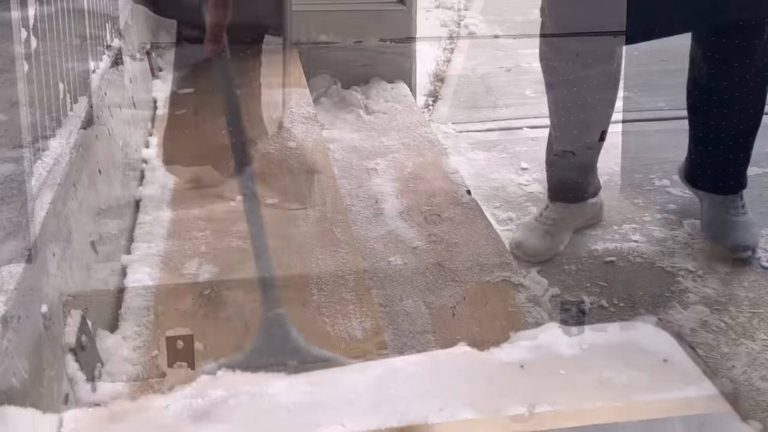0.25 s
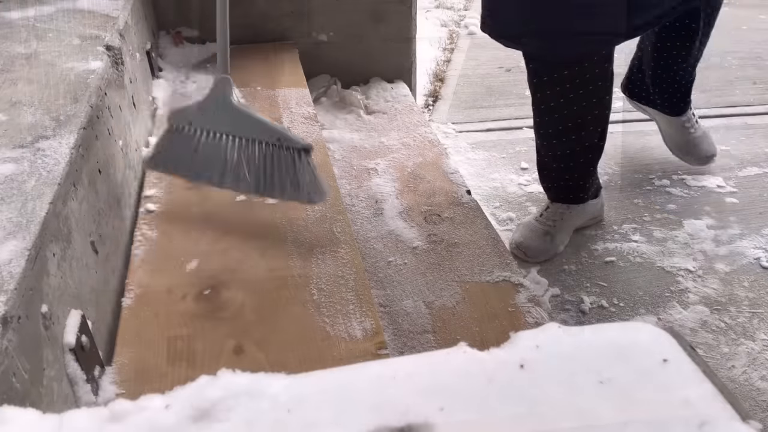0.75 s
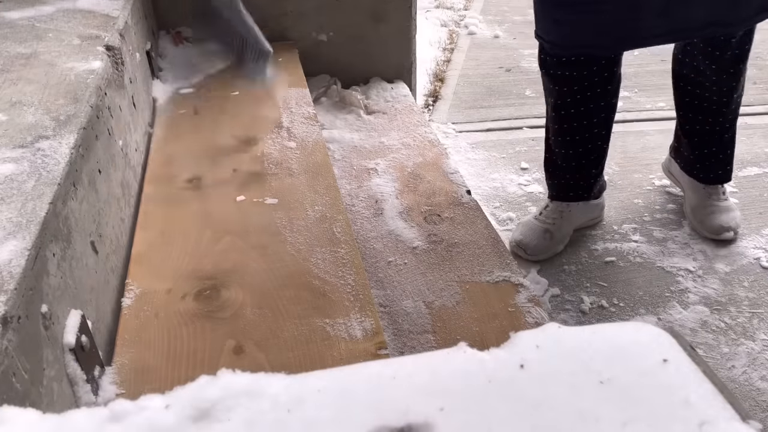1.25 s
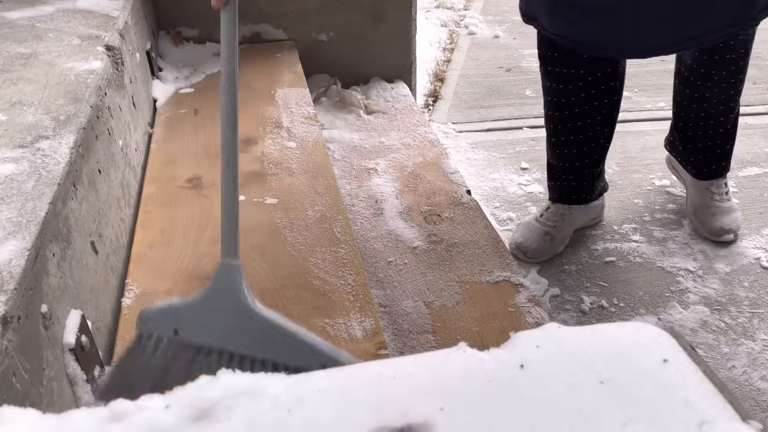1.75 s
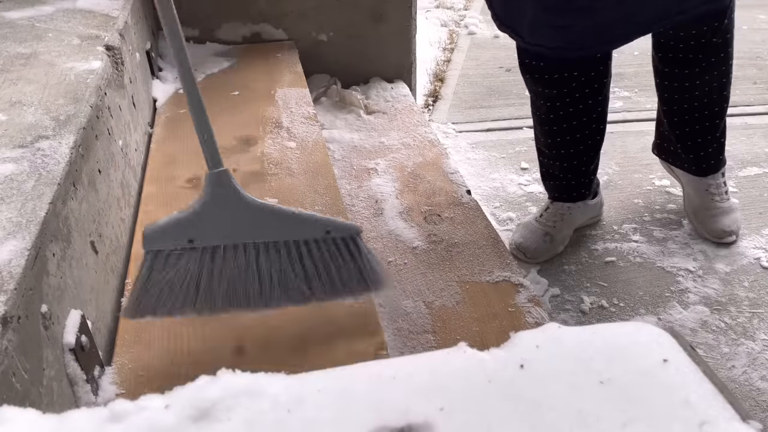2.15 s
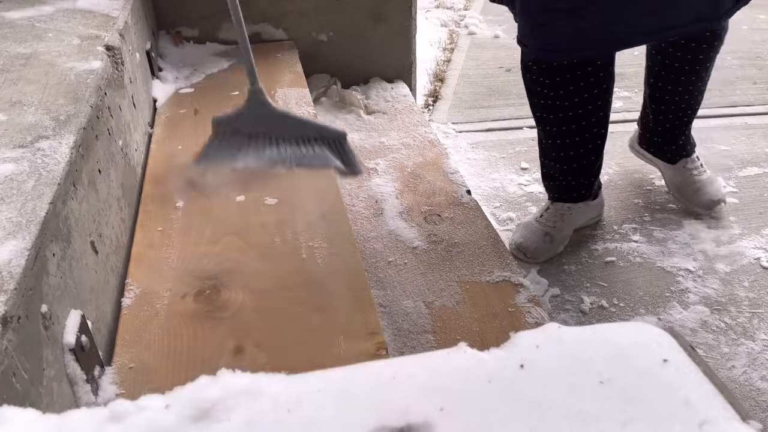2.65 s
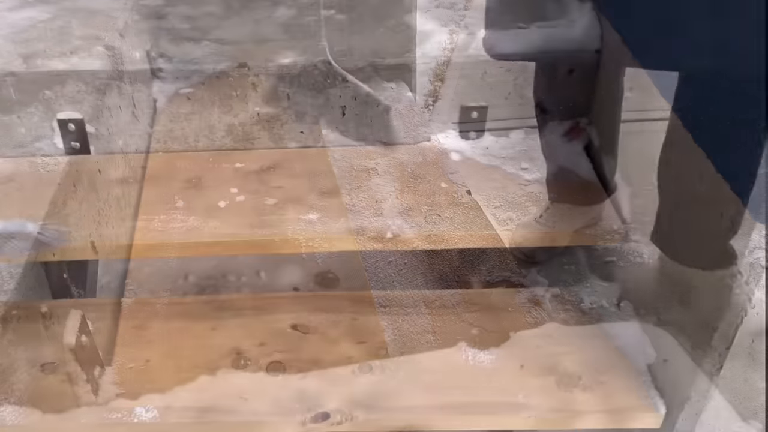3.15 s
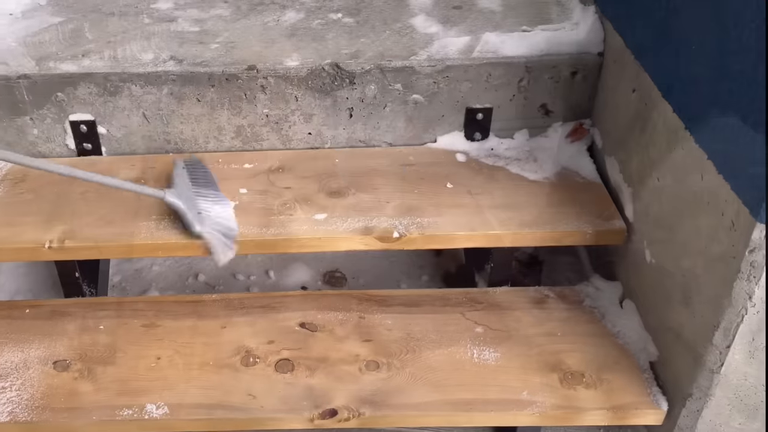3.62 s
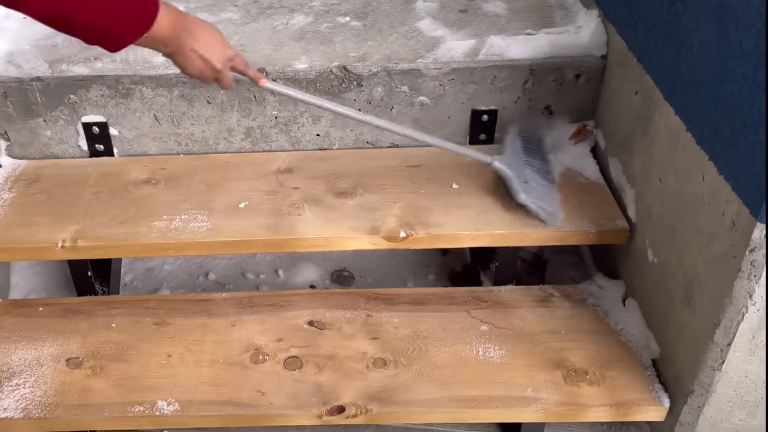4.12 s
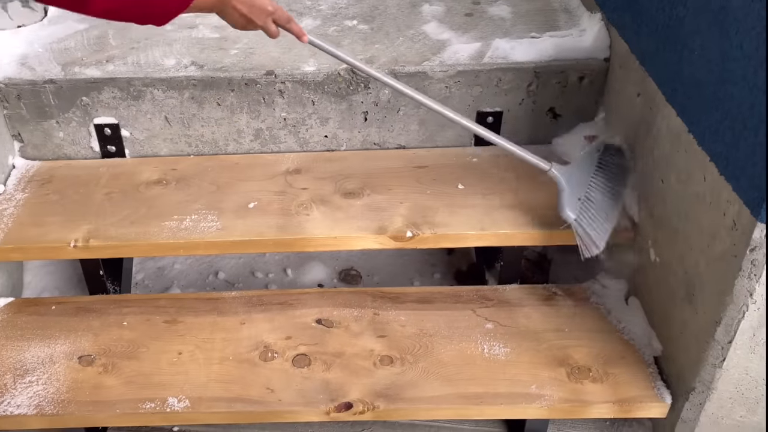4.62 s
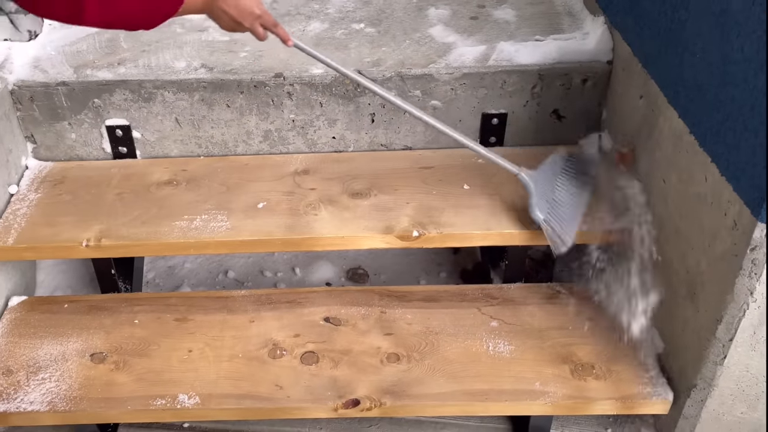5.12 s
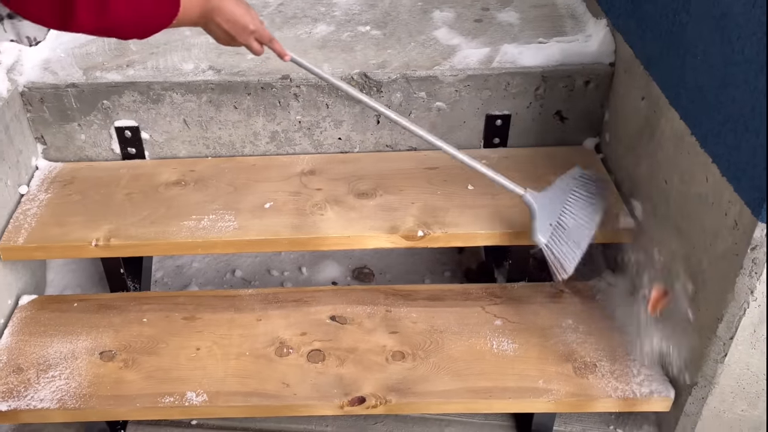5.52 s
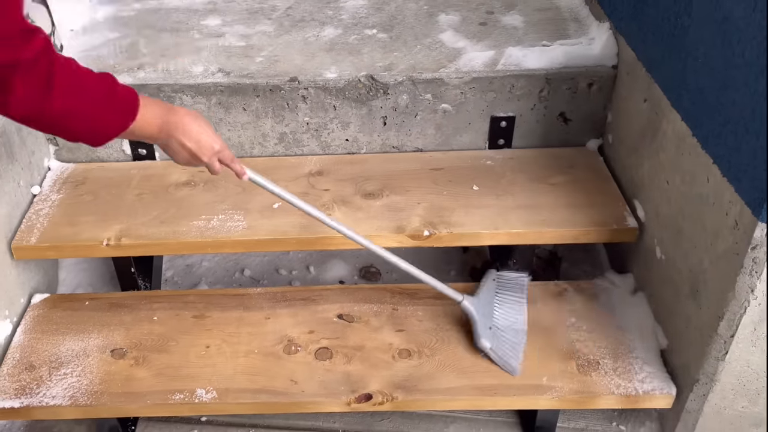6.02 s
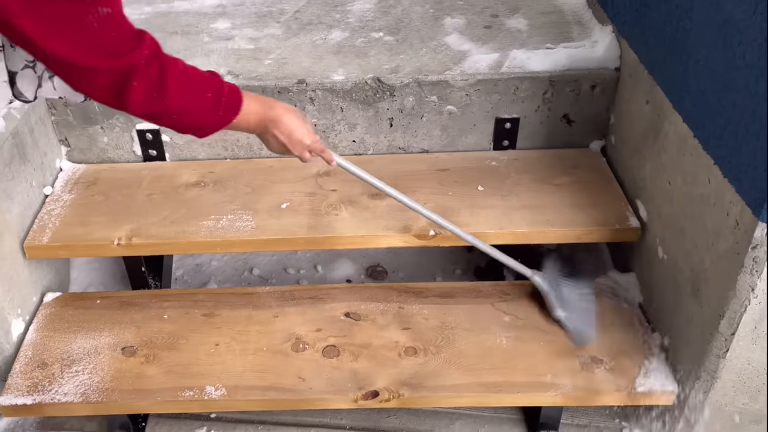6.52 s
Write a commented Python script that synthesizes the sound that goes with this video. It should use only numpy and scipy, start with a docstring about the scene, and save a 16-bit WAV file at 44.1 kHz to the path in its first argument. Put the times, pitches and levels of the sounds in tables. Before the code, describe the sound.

Close stereo pickup of a plastic-bristle broom on snowy wooden steps beside concrete. Slow, soft swishes and gritty scrapes come first, with low hollow plank thuds as the broom lands. After a near pause, strokes grow quicker and brighter; a very loud hard plastic knock hits near five seconds, another near six and a half. Faint traffic rumbles far behind.

```python
"""A plastic-bristle broom sweeps light snow off wooden steps beside a concrete wall, over far traffic.
Bristle tips that stick and slip are dense random clicks, filtered into hiss, scrape and drag on the planks.
Planks thud where the broom lands, as dying modes; its head knocks on edges, as a crack and a ring.
Traffic is bands of noise. Two microphone ports a short way apart pick the sound up."""
import sys
import numpy as np
from scipy import signal
from scipy.fft import rfft, irfft, next_fast_len
from scipy.io import wavfile
from scipy.ndimage import uniform_filter1d

SR = 44100
rng = np.random.default_rng(int(sys.argv[2]) if len(sys.argv) > 2 else 0)


def to_wav(s):
    """Save 16-bit WAV."""
    ch = np.atleast_2d(s).T  # columns
    pcm = np.round(np.clip(ch, -1, 1) * 32767)  # PCM
    wavfile.write(sys.argv[1], SR, pcm.astype(np.int16))


def undo_db(level):
    """Turn decibels back into plain size, where 20 dB means ten times bigger."""
    steps = np.asarray(level, float) / 20
    return 10 ** steps


N = 298448
FAST = next_fast_len(N)
NEXT_STEP_S = 3.3  # from here on the broom works on the far plank

# Modes of the broom head. Each row: frequency in Hz, level in dB, 60 dB decay time in seconds.
HEAD_MODES = [(458, -1, 0.04), (580, -6, .04), (775, -3, 0.06), (1040, -4, 0.036), (1177, 0, 0.05),
              (1340, -5, .04), (1780, -7, 0.045), (1975, -4, 0.03), (2280, -4, 0.03), (2610.9, -7, 0.022),
              (3190, 0, 0.018), (3780, -6, 0.03), (4780, -7, .014)]
# Modes of the near plank. Each row: frequency in Hz, level in dB, 60 dB decay time in seconds.
NEAR_PLANK_MODES = [(114.62, 1.5, 1), (246.71, -3.5, 0.3413), (303.5, -10.5, 0.2919)]
# Modes of the far plank. Each row: frequency in Hz, level in dB, 60 dB decay time in seconds.
FAR_PLANK_MODES = [(116.62, -4, 1), (225.16, 3.5, 0.3695), (252.77, -4, 0.2458), (442.59, -9, 0.09324)]


def evened(x):
    """Normalises mean power: scales to rms 1."""
    return x / np.sqrt(np.mean(x ** 2) + 1e-20)


def read(points, hz, column=1):
    """Pitch is logarithmic: reads a spectrum table along a log-frequency axis."""
    rows = np.transpose(points)
    return np.interp(np.log(hz + 1), np.log(rows[0] + 1), rows[column])


def curve(rows, t, column):
    """Linear interpolation in time: one column of a time table at the times t."""
    rows = np.transpose(rows)
    return np.interp(t, rows[0], rows[column])


def coloured(x, points):
    """Linear filtering multiplies spectra: applies a table of gains without phase shift."""
    gain = undo_db(read(points, np.fft.rfftfreq(FAST, 1 / SR)))
    return irfft(rfft(x, FAST) * gain, FAST)[:, :N]


def ports(pair, direct=0):
    """Partial coherence: the right port hears a phase-shifted share of the left sound and an unrelated share."""
    # Each row: frequency in Hz, likeness 0-1 for direct=0, phase by which left leads in radians,
    # left over right in dB.
    spacing = [(59.95, 0.99, 0, 1.6366), (364.82, 0.8, 0.0206, 1), (761.1, 0, 0.5678, 0),
               (1188.9, 0.16, 1.5, 3), (2100, 0.62, 0.3893, 0.5), (3778.4, 0.27, 0.7745, 5),
               (5670.7, 0.51, -2.5, 3.5), (6573.4, 0.97, 0, -1.5), (7802, 0.91, -3, 4.5),
               (9034.9, 0.99, -3, -2.5), (11491, 0.35, -6, 1.5), (12752, 1, -6, 0)]
    hz = np.fft.rfftfreq(FAST, 1 / SR)
    left, unrelated = rfft(pair, FAST)
    same = np.clip(read(spacing, hz), 0, 1) ** (1 - direct)  # more alike when direct
    shifted = left * np.exp(-1j * read(spacing, hz, column=2))
    right = same * shifted + np.sqrt(1 - same ** 2) * unrelated
    lean = undo_db(read(spacing, hz, column=3) / 2)
    return irfft(np.array([left * lean, right / lean]), FAST)[:, :N]


def in_band(x, lo_hz, hi_hz):
    """Band power sets the level: scales a stereo sound to rms 1 in one band of its middle."""
    bandpass = signal.butter(4, [lo_hz, hi_hz], "band", fs=SR, output="sos")
    band = signal.sosfilt(bandpass, x.mean(0))
    return x / np.sqrt(np.mean(band ** 2))


def ring(modes, shift_db=0, turns=0):
    """Modal superposition: one second of decaying sines, with lifts and starting phases in turns."""
    t = np.arange(SR) / SR
    hz, db, t60 = np.transpose(modes)[:, :, None]
    decay = undo_db(db + shift_db - 60 * t / t60)
    return (decay * np.sin(2 * np.pi * (hz * t + turns))).sum(0)


def slips(per_s, spread_db, clump_db, clump_s):
    """Stick-slip friction: bristle tips let go in dense random clicks of unequal size, in clumps."""
    happens = rng.exponential(1, (2, N))
    size = undo_db(spread_db * np.minimum(happens, 4)) * (rng.random(N) < per_s / SR)
    clumps = evened(uniform_filter1d(rng.standard_normal(N), max(round(clump_s * SR), 1)))
    return size * rng.standard_normal((2, N)) * undo_db(clump_db * clumps)


def motion():
    """Powers of independent sounds add: levels of hiss, scrape and drag from rustle, strokes, landings, flicks."""
    # A faint rustle throughout. Each row: time in seconds, hiss level in dB, scrape level in dB.
    rustle = [(0, -64, -66.5), (1.399, -61, -64.5), (1.565, -69, -65), (2.107, -64, -60.5),
              (2.294, -84, -62.5), (2.818, -63.5, -63), (3.25, -87, -68), (4.318, -61, -61),
              (5.509, -60, -63.5), (6.022, -83, -65)]
    # Slides of the broom. Each row: start of full level in seconds, rise scale in seconds, hold in seconds,
    # fall scale in seconds, hiss level in dB, scrape level in dB.
    strokes = [(0.551, 0.1769, 0.00489, 0.08287, -49.5, -57), (1.074, 0.11351, 0.09193, 0.1508, -43.5, -51),
               (2.044, 0.1134, 0.0412, 0.02565, -55, -54.5), (2.612, 0.1348, 0.14024, 0.04443, -45.5, -50),
               (3.151, 0.11885, 0.03057, 0.08, -61, -63.0), (3.487, 0.0538, 0.02454, 0.01586, -58, -61.5),
               (3.891, 0.2838, 0.1405, 0.19216, -48, -46.0), (4.355, 0.02092, 0.0376, 0.0612, -57, -53.5),
               (4.494, 0.106, 0.01002, 0.14547, -46.5, -46.5),
               (4.984, 0.05557, 0.00393, 0.10579, -41.5, -49.5),
               (5.241, 0.08187, 0.01382, 0.1858, -48, -47.5), (5.333, 0.0807, 0.01558, 0.01755, -56, -44.5),
               (5.669, 0.05, 0.00536, 0.05549, -48.0, -44), (6.093, 0.05567, 0.009, 0.06917, -47.5, -46),
               (6.678, 0.16248, 0.00716, 0.06682, -40.5, -42)]
    # Drag over scrape in a stroke. Entries: near plank in dB, far plank in dB.
    drag_over_db = [4.2, -1.7238]
    # The bristle pad comes down and crunches. Each row: start in seconds, hiss level in dB, scrape level in dB,
    # drag level in dB, time to fade 20 dB in seconds, time it stays pressed in seconds.
    landings = [(.158, -58, -56, -54, 0.19, 0.012684), (0.903, -51.5, -52.5, -42, 0.07, 0.028),
                (1.819, -46.5, -46, -44, 0.1335, 0.03426), (2.355, -50, -46.5, -37, 0.1335, 0.01094),
                (3.564, -54, -46.5, -46.5, 0.054, 0.003204), (4.816, -42.5, -36, -38.5, 0.1996, 0.03112),
                (5.566, -48, -52.5, -54, 0.0435, 0.0361), (5.72, -53.5, -64, -51, 0.3124, 0.03518),
                (6.007, -50.5, -44, -44.5, 0.0012, .004), (6.168, -46, -44.5, -45, 0.0968, 0.04419),
                (6.518, -60, -45, -34.5, 0.1021, 0.00979)]
    # Bent bristles spring free with a bright swish. Each row: peak time in seconds, hiss level in dB.
    flicks = [(2.094, -47.5), (4.169, -42), (4.577, -35.5), (5.398, -42)]
    slow_db, bend = [-11.5, -13, -14.5], 2.1574  # hiss, scrape, drag one scale from full; roundness of the arch
    swell_s = 0.016547  # the crunch swells
    flick_rise_s, flick_fall_s = 0.04, 0.06094  # for 20 dB

    t = np.arange(0, N + 32, 32) / SR
    hiss_db, scrape_db = curve(rustle, t, column=1), curve(rustle, t, column=2)
    power = undo_db(np.array([hiss_db, scrape_db, scrape_db + 8.5])) ** 2
    for s, rise, hold, fall, hiss_db, scrape_db in strokes:
        away = np.maximum((s - t) / rise, (t - s - hold) / fall)
        slow = np.maximum(away, 0) ** bend
        top_db = np.array([hiss_db, scrape_db, scrape_db + drag_over_db[int(s > NEXT_STEP_S)]])
        power += undo_db(top_db[:, None] + np.outer(slow_db, slow)) ** 2
    for s, *top_db, fade, press in landings:
        after = np.maximum(t - s, 0)
        fading = undo_db(-20 * np.maximum(after - swell_s - press, 0) / fade)
        shape = np.minimum(after / swell_s, 1) * fading
        power += np.outer(undo_db(np.array(top_db)), shape) ** 2
    for s, db in flicks:
        away = np.maximum((s - t) / flick_rise_s, (t - s) / flick_fall_s)
        power[0] += undo_db(db - 20 * away) ** 2  # treble only
    return [np.interp(np.arange(N) / SR, t, level) for level in np.sqrt(power)]


def sweep():
    """Friction excites resonance: slips give hiss, scrape and drag; scrape and drag shake the plank and head."""
    # Spectrum of the bristle hiss. Each row: frequency in Hz, relative gain in dB.
    hiss_gain = [(1500, -44.5), (4000, -10.5), (7000, -2.5), (9000, 1), (12000, 0), (14000, 3),
                 (15600, -4.5), (16100, -30)]
    # Spectrum of the snow scrape. Each row: frequency in Hz, relative gain in dB.
    scrape_gain = [(500, -12.5), (1500, -1), (2500, 1), (4000, -3.5), (6000, -5), (9000, -32)]
    # Spectrum of the drag on the planks. Each row: frequency in Hz, relative gain in dB.
    drag_gain = [(130, -12.5), (300, 1.5), (480, 0.5), (1000, -0.5), (1500, -4.5), (2500, -27)]
    hiss_slips = slips(per_s=20000, spread_db=1.8, clump_db=.8, clump_s=.006)
    hiss = in_band(ports(coloured(hiss_slips, hiss_gain)), 11500, 15500)
    scrape_slips = slips(per_s=9000, spread_db=2.4, clump_db=1.7, clump_s=.01)
    scrape = in_band(ports(coloured(scrape_slips, scrape_gain)), 2000, 6000)
    drag_slips = slips(per_s=5000, spread_db=2.4, clump_db=1.9, clump_s=.012)
    drag = in_band(ports(coloured(drag_slips, drag_gain)), 450, 1600)
    hiss, scrape, drag = (x * level for x, level in zip((hiss, scrape, drag), motion()))

    near = np.arange(N) < NEXT_STEP_S * SR
    plank = 0
    for side, modes, db in ((near, NEAR_PLANK_MODES, -13), (~near, FAR_PLANK_MODES, -11)):
        response = evened(ring(modes))[None] / np.sqrt(SR)
        plank = plank + undo_db(db) * signal.fftconvolve(drag * side, response, axes=1)[:, :N]
    # the head hums along
    head = signal.fftconvolve(scrape + drag, ring(HEAD_MODES, turns=0.29604)[None], axes=1)[:, :N]
    hollow = signal.lfilter(*signal.iirpeak(950, 10, SR), drag * near)  # the near step sounds hollow
    return hiss + undo_db(-2.0) * (scrape + drag + hollow) + plank + undo_db(-51.5) * head


def traffic():
    """Filtered noise stands for many far sources: two bands of engine rumble under a smooth tyre wash."""
    # Each row: time in seconds, low engines level in dB, higher engines level in dB, tyre wash level in dB.
    flow = [(0, -38, -44.5, -57.5), (.5, -49, -45.5, -59), (1.3, -43.5, -39.5, -54),
            (2.7, -45.5, -37, -53.5), (3.4, -52.5, -47, -59.5), (3.9, -43, -45, -55.5),
            (5.3, -39, -49, -54), (6.77, -36.5, -49, -52.5)]
    # Spectrum of the tyre wash. Each row: frequency in Hz, relative gain in dB.
    wash_gain = [(100, -1.5), (170, 14), (320, 7.5), (500, -3), (1100, -2), (1700, -5), (2600, -12.5),
                 (5000, -24), (16000, -74.5)]
    # Bands of engine rumble. Each row: centre in Hz, width in Hz.
    engines = [(56, 21.55), (100, 64.65)]
    hz, t = np.fft.rfftfreq(FAST, 1 / SR), np.arange(N) / SR
    wash = in_band(ports(coloured(rng.standard_normal((2, N)), wash_gain)), 600, 1600)
    out = undo_db(curve(flow, t, column=3)) * wash
    for k, (centre_hz, width_hz) in enumerate(engines, start=1):
        bell = np.exp(-2 * ((hz - centre_hz) / width_hz) ** 2)
        band = irfft(rfft(rng.standard_normal((2, FAST))) * bell, FAST)
        out += undo_db(curve(flow, t, column=k)) * evened(ports(band))
    return out


def corner(x):
    """Reverberation in a corner of concrete and steps: three dense short tails, alike at both ports, take turns."""
    t60_s, level_db = 0.05609, -7.5
    t, out = np.arange(SR // 8) / SR, 0
    for k, taps in enumerate(rng.standard_normal((3, len(t)))):
        dull = uniform_filter1d(taps, 5)  # loses treble
        tail = dull * undo_db(-60 * t / t60_s) * (t > .003)  # starts a few ms late
        # the shares turn steadily, one cycle a second, at constant total power
        share = np.sqrt(2 / 3) * np.cos(np.pi * (2 * np.arange(N) / SR + k / 3))
        out = out + signal.oaconvolve(x * share, tail[None] / np.linalg.norm(tail), axes=1)[:, :N]
    return undo_db(level_db) * out


def knocks():
    """Impact excitation: a few ms of rattling contact crack and swell the head's ring; the place picks the modes."""
    # Knocks of the broom head; the row at 2.361 s is instead the crunch as the bristle pad comes down, made the
    # same way. Each row: start in seconds, ring peak in dB, crack peak in dB (both before the # ports), contact
    # time scale in seconds, place along the head 0-1, frequency of strongest ring in Hz, # breadth of the ring
    # in octaves.
    blows = [(0.1835, -33.5, -36, 0.0045, 0.12, 1700, .33), (2.361, -34, -47.5, 0.00745, 0.07, 1000, 1),
             (2.9198, -36, -37, 0.0025, 0.04, 4900, .4), (3.151, -33.5, -48, .003, .3, 620, .65),
             (3.16, -31, -46, .0035, .27, 700, .7), (3.574, -40, -32, 0.002334, .2, 1500, 1),
             (4.729, -54.5, -31, 0.004095, 0.03, 4000, 1), (4.8181, 0, 1.5, 0.003, 0.46, 1300, 2.5),
             (5.238, -16, -21, 0.0035, .54, 1250, 1.9), (5.34, -31, -45, .004, .15, 1170, .3),
             (5.768, -30, -25, 0.003007, 0.07, 2500, 1), (6.5245, -1, -10, 0.0043, 0.05, 1000, 1.42)]
    cracks, rings = np.zeros((2, N + SR)), np.zeros((2, N + SR))
    hz = np.transpose(HEAD_MODES)[0]
    rattles = rng.standard_normal((len(blows), 2, SR))
    phases = rng.random((len(blows), len(HEAD_MODES), 1))
    for blow, rattle, turns in zip(blows, rattles, phases):
        s, ring_db, crack_db, contact, place, best_hz, breadth = blow
        start = round(s * SR)
        u = np.arange(SR) / SR / np.clip(contact, .0005, .01)  # time in contact scales
        by_place = abs(np.sin(np.pi * place * hz / 395)) + 0.01764
        by_pitch = np.exp(-(np.log2(hz / best_hz) / breadth) ** 2) + 1e-3
        lift_db = 20 * np.log10(by_place * by_pitch)[:, None]
        swell = (1 - np.exp(-1.2 * u)) * (0.1751 + np.exp(-(u / 1.4683) ** 4))  # driven in contact, then free
        body = ring(HEAD_MODES, lift_db, turns) * swell
        burst = rattle * np.sqrt(u) * np.exp(-.6 * u ** 2)
        crack = signal.lfilter([1, -1], [1, -.8], burst)  # the snap holds little bass
        rings[:, start:][:, :SR] += undo_db(ring_db) * body / abs(body).max()
        cracks[:, start:][:, :SR] += undo_db(crack_db) * crack / abs(crack).max()
    return ports(rings[:, :N], direct=0.9569) + ports(cracks[:, :N], direct=0.394)


def thuds():
    """A soft blow excites low modes: the push of the bristle pad sets the plank ringing."""
    # The broom lands. Each row: start in seconds, peak in dB before the stereo lean, rise in seconds,
    # lift of the upper modes in dB.
    pushes = [(0.923, -32.5, 0.017, 11), (1.835, -26.5, 0.01313, 11.5), (2.384, -14.5, 0.007628, 34.5),
              (3.578, -24.5, 0.009751, -17), (6.535, -17.5, 0.011048, 0.5)]
    out, t = np.zeros(N + SR), np.arange(SR) / SR
    for s, db, rise, upper_db in pushes:
        modes = NEAR_PLANK_MODES if s < NEXT_STEP_S else FAR_PLANK_MODES
        lift_db = upper_db * (np.arange(len(modes)) > 0)[:, None]
        damping = 1 + 2.717 * np.exp(-(t / 0.01373) ** 2)  # the bristles damp the first swings
        swing = (1 - np.exp(-(t / rise) ** 2)) * damping
        blow = swing * ring(modes, lift_db)
        out[round(s * SR):][:SR] += undo_db(db) * blow / abs(blow).max()
    return out[:N] * undo_db(np.array([[.7], [-.7]]))  # leans left


def scene():
    """Superposition of broom, steps and street; the knocks come drier than the bristles, close along the boards."""
    bristles, head = sweep(), knocks()
    return bristles + head + corner(bristles + undo_db(-7) * head) + thuds() + traffic()


def band_limit(x):
    """A steep low-pass at the top of the band."""
    return signal.sosfilt(signal.butter(12, 16550, fs=SR, output="sos"), x)


def record(dry):
    """Band limiting and overload: the microphone drops deep bass and top treble, and clips at full scale."""
    heard = signal.sosfilt(signal.butter(2, 46, "high", fs=SR, output="sos"), dry)
    lowpass = signal.firwin(255, 16000, window=("kaiser", 8), fs=SR)
    heard = signal.oaconvolve(heard, lowpass[None], "same")
    return band_limit(np.clip(heard, -1, 1))


dry = scene()
out = record(dry)
to_wav(out)
```